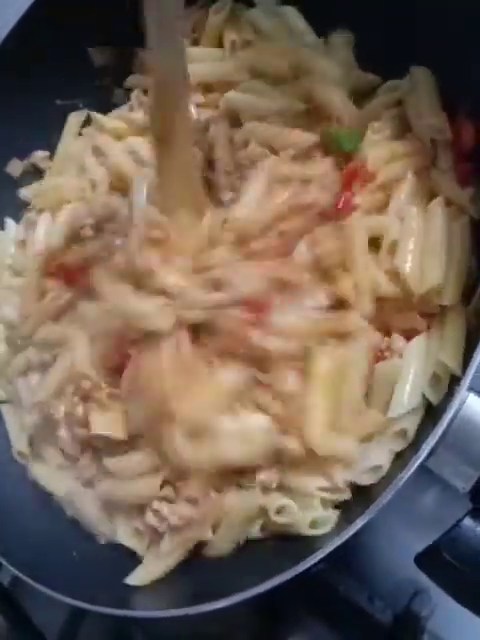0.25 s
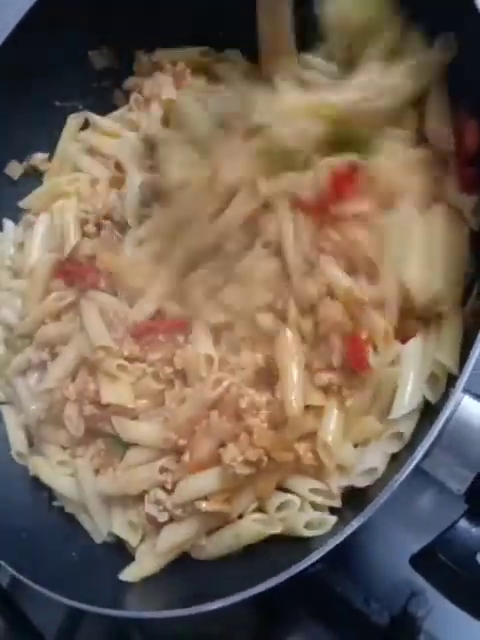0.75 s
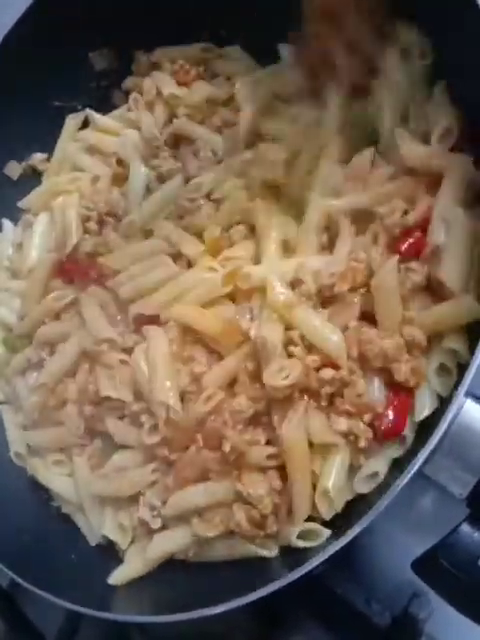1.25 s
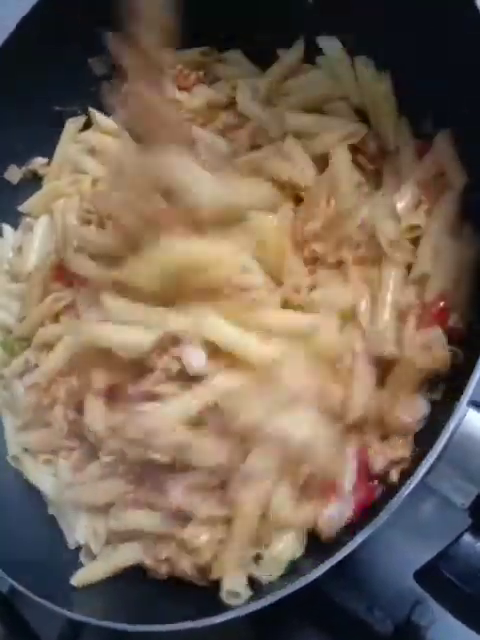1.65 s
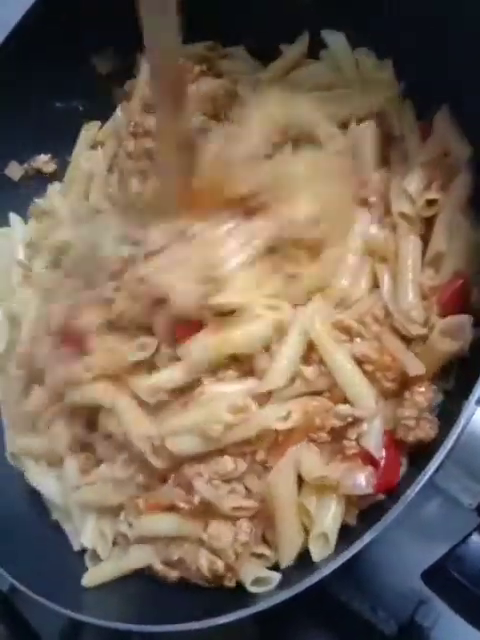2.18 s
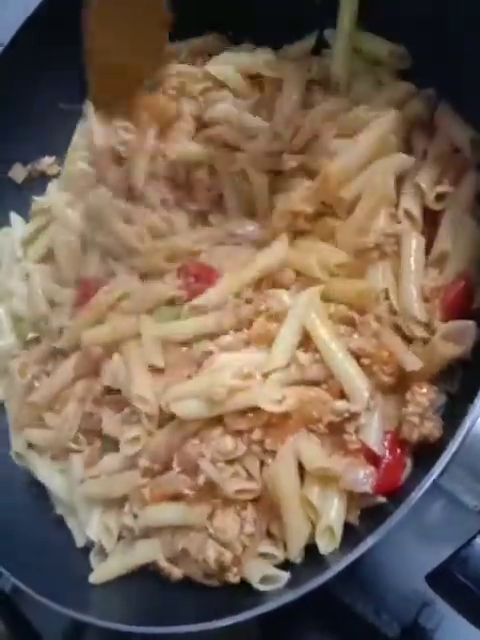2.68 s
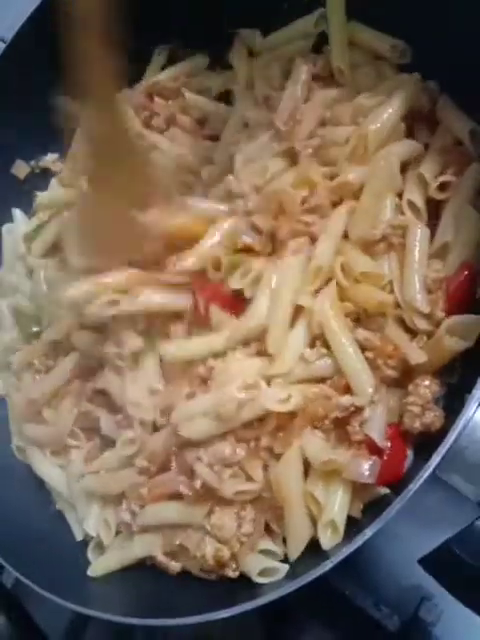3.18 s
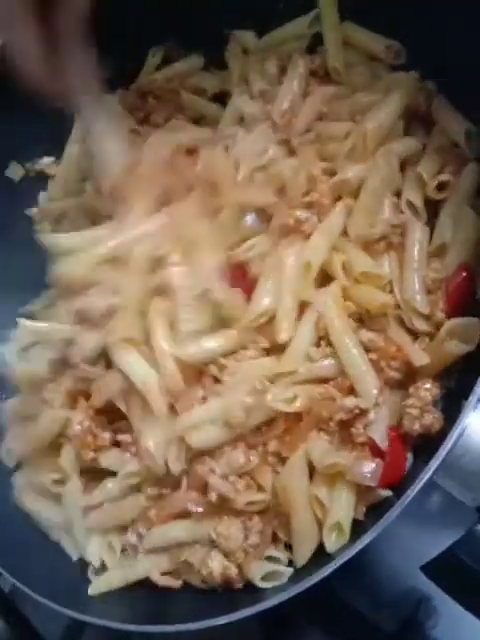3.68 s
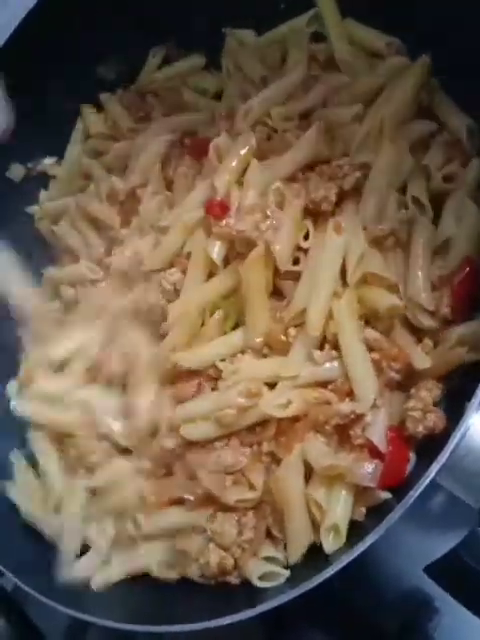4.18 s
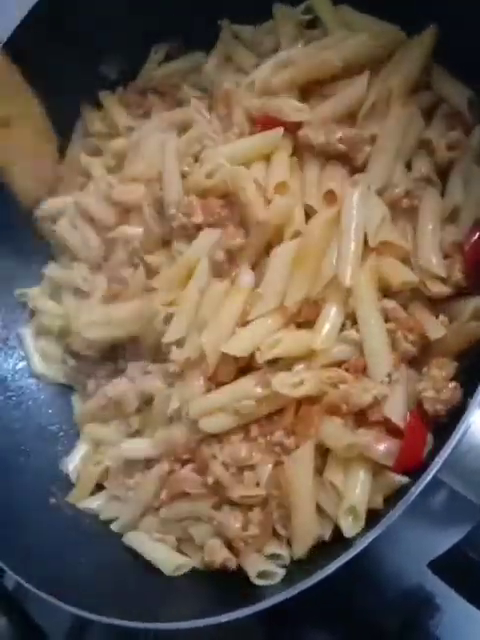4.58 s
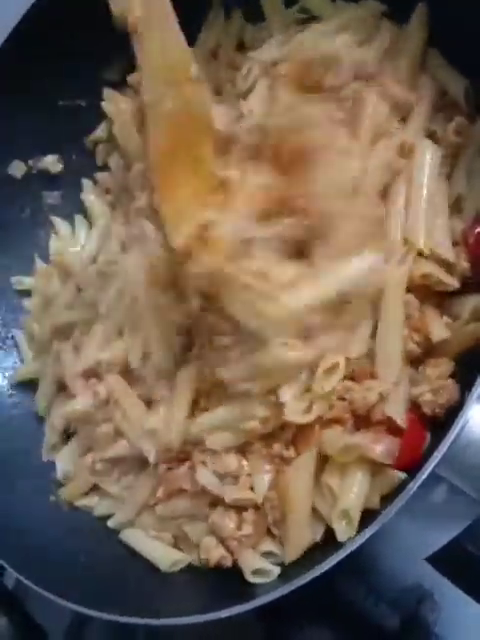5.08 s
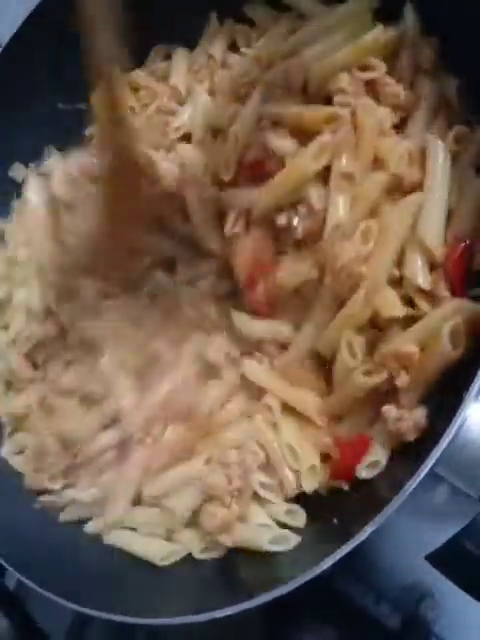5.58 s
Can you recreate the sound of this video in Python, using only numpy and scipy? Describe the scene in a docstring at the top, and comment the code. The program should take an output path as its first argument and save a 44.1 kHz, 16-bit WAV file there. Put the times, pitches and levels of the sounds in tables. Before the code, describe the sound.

A wooden spoon scrapes and tosses sticky sauced pasta in a pan, with wet squelches, wooden knocks and a low stove rumble.

```python
"""A wooden spoon stirs sauced penne in a nonstick pan on a stove, close to the microphone.
From the start the strokes scrape by stick-slip and sauce films tear, over the stove's filtered-noise rumble and hiss.
Rubbery squeaks, wooden knocks with ringing modes and sticky ticks soon join; a sine mains hum comes in spells.
Knocks and thuds of the rocking pan crowd together near the middle; later the spoon's bare shaft raps the rim.
Stirring goes on to the end, with a short, soft echo of nearby walls behind it.
"""
import sys
import numpy as np
from scipy import signal
from scipy.fft import rfft, irfft, next_fast_len
from scipy.io import wavfile
from scipy.ndimage import uniform_filter1d, map_coordinates

SR = 44100
rng = np.random.default_rng(int(sys.argv[2]) if len(sys.argv) > 2 else 0)


def generate_wav(signal):
    """Clip the signal to [-1, 1] and save it as 16-bit WAV at the path in sys.argv[1]."""
    frames = np.transpose(np.atleast_2d(signal))
    scaled = np.clip(frames, -1, 1) * 32767
    pcm = np.round(scaled).astype(np.int16)
    wavfile.write(sys.argv[1], SR, pcm)


N = 257984


def amp(db):
    """Decibels to amplitude ratio."""
    return 10 ** (np.asarray(db) / 20)


def unit(x):
    """Normalisation to an rms of 1."""
    return x / np.sqrt(np.mean(x ** 2) + 1e-20)


def peak(x):
    """Normalisation to a peak of 1."""
    return x / (np.abs(x).max() + 1e-20)


def wobble(rate):
    """Slow random modulation: a smooth curve through rate random knots a second."""
    return map_coordinates(rng.standard_normal(int(N * rate / SR) + 4), [np.arange(N) * rate / SR])


def add(track, s, sound):
    """Superposition: mix a sound into the track at s seconds."""
    part = track[max(round(s * SR), 0):][:len(sound)]
    part += sound[:len(part)]


def colour(x, points, size=8192):
    """Minimum-phase filtering: a causal response with the gain of the (Hz, dB) points."""
    hz, db = np.transpose(points)
    gain = amp(np.interp(np.log(np.fft.rfftfreq(size, 1 / SR) + 1), np.log(hz), db))
    # folding the cepstrum onto positive time makes the response causal
    cepstrum = irfft(np.log(gain))
    cepstrum[1:size // 2] *= 2
    cepstrum[size // 2 + 1:] = 0
    response = irfft(np.exp(rfft(cepstrum)))[:size // 2]
    return signal.fftconvolve(x, response)[:len(x)]


def ring(modes, scatter_db, tilt_db=0):
    """Modal superposition: neighbours swing in opposite senses; tilt_db an octave weights the upper modes."""
    hz, width, db = np.transpose(modes)[:, :, None]
    t = np.arange(SR // 4) / SR
    tilt = tilt_db * np.maximum(np.log2(hz / np.median(hz)), 0)
    level = db + tilt + scatter_db * rng.standard_normal(hz.shape)
    sense = (-1) ** np.arange(len(hz))[:, None]
    decay = np.exp(-np.pi * width * t)
    return np.sum(sense * amp(level) * width * decay * np.sin(2 * np.pi * hz * t), axis=0)


def through(x, modes):
    """Forced vibration: a steady excitation rings a set of modes."""
    return unit(signal.fftconvolve(x, ring(modes, scatter_db=2.5))[:N])


def grains(rate, spread_db):
    """Impulsive excitation: random tiny clicks of uneven size, rate a second."""
    sizes = amp(spread_db * np.clip(rng.standard_normal(N), -2, 2)) * rng.choice([-1, 1], N)
    return unit((rng.random(N) < rate / SR) * sizes)


def shifting(x, depth_db, width_hz, span_s):
    """Time-varying filtering: the colour drifts in random patches of frequency and time."""
    z = signal.stft(x, nperseg=1024)[2]
    field = rng.standard_normal(z.shape)
    field = uniform_filter1d(field, max(round(width_hz * 1024 / SR), 1), axis=0, mode="wrap")
    field = uniform_filter1d(field, max(round(span_s * SR / 512), 1), axis=1, mode="wrap")
    return unit(signal.istft(z * amp(depth_db * unit(field)), nperseg=1024)[1][:N])


# Bands that reflections in the pan cancel or reinforce.
# Each row: centre in Hz, width in Hz, depth in dB before the share is taken.
HOLLOWS = [(2550, 130, -3.5), (2820, 110, 2), (3090, 130, -9), (3350, 90, -2), (3610, 75, -8),
           (4220, 100, -6), (4520, 150, 2), (5020, 140, -8), (5320, 80, 3), (5640, 90, 2.5),
           (6240, 100, -2.5), (7100, 120, -1.5)]


def hollowed(x, share=1):
    """Interference: reflections between the pan's wall and the food carve gaps and humps into the treble."""
    hz = np.arange(1, SR // 2, 20)
    db = sum(depth * np.exp(-((hz - centre) / width) ** 2) for centre, width, depth in HOLLOWS)
    return colour(x, np.transpose([hz, share * db]))


# Strokes of the spoon.
# Each row: hardest push in seconds, rise in seconds, fall in seconds, scraping level in dB,
# base level of the wet pasta in dB, level of the pan dragged on its support in dB,
# fizz level in dB before its common lift, scrape pitch at the hardest push in Hz.
STROKES = [(0.0, 0.15, 0.1, -32, -40, -72, -60.5, 1160), (0.07, 0.049, 0.21, -48, -48.5, -40, -68, 920),
           (0.257, 0.74, 0.28, -50, -50, -62, -73.5, 1010), (0.55, 0.031, 0.22, -40, -45, -47.5, -72, 1570),
           (0.705, 0.07, 0.11, -31, -41, -40.5, -65.5, 1270),
           (0.886, 0.092, 0.32, -51.5, -52.5, -61, -69, 990), (1.265, 0.034, 0.12, -49, -50, -57, -72, 750),
           (1.34, 0.072, 0.37, -43.5, -46, -73, -71, 1330),
           (1.666, 0.13, 0.1, -50.5, -59.5, -55, -79, 1440), (2.01, 0.13, 0.17, -39, -42.5, -61, -68, 1015),
           (2.22, 0.35, 0.099, -46, -52.5, -78, -77, 1430), (2.495, 0.29, 0.2, -45, -46.5, -83, -70, 1360),
           (2.738, 0.094, 0.24, -43, -47, -40.5, -75, 850),
           (2.866, 0.07, 0.061, -33, -41, -39, -60.5, 1540), (2.919, 0.085, 0.07, -36, -41, -36, -65, 1000),
           (3.045, 0.12, 0.19, -37.5, -46.5, -35, -79, 835),
           (3.464, 0.049, 0.02, -44, -44.5, -43, -66.5, 995),
           (3.557, 0.068, 0.27, -38.5, -41.5, -43, -69, 960),
           (3.665, 0.047, 0.078, -48, -53.5, -69, -76, 1150),
           (4.093, 0.033, 0.26, -58, -48, -75, -75, 1320), (4.26, 0.14, 0.42, -44.5, -46, -56, -71, 1130),
           (4.64, 0.096, 0.11, -42, -47, -48, -69, 1160), (4.746, 0.11, 0.078, -30, -37.5, -65, -59.5, 850),
           (4.841, 0.12, 0.38, -73, -45.5, -59, -75, 985), (5.375, 0.2, 0.3, -47.5, -44.5, -65, -63, 940),
           (5.504, 0.23, 0.15, -46.5, -48, -57, -76, 1010),
           (5.721, 0.077, 0.036, -46.5, -73, -58, -84, 860), (5.86, 0.073, 0.2, -50, -50, -44, -72, 965)]
PUSH_S, FADE_DB = 0.048, 20  # time held at full force; change of level over one rise or fall time


def stirring(levels_db, lingers=1, lag_s=0):
    """Energy addition: strokes rise, hold and fall away, and overlapping ones add in power."""
    t, power = np.arange(N) / SR - lag_s, np.zeros(N)
    for (s, rise, fall, *_), db in zip(STROKES, levels_db):
        before = (s - PUSH_S / 2 - t) / rise
        after = (t - s - PUSH_S / 2) / fall
        away = np.maximum(before, after).clip(0) / lingers  # lingers stretches both rise and fall
        near = away < 3
        power[near] += amp(db - FADE_DB * away[near]) ** 2
    return np.sqrt(power)


SAG_OCT_PER_S, SAG_S = 2.5, 0.038  # fall of pitch, for this long either side of the hardest push


def gliding(x, lift_db, width_oct):
    """Moving resonance: the contact's spectral hump slides down in pitch as the spoon digs in."""
    hz, t, z = signal.stft(x, SR, nperseg=512)
    s, *_, pitch_hz = np.transpose(STROKES)
    stroke = np.abs(t[:, None] - s).argmin(axis=1)  # the nearest stroke sets the pitch
    sag_oct = SAG_OCT_PER_S * np.clip(t - s[stroke], -SAG_S, SAG_S)
    centre_hz = pitch_hz[stroke] * 2 ** -sag_oct
    octaves = np.log2((hz[:, None] + 1) / centre_hz)
    hump = amp(lift_db * np.exp(-(octaves / width_oct) ** 2))
    return unit(signal.istft(z * hump, nperseg=512)[1][:N])


# Modes of the loaded pan. Each row: frequency in Hz, width in Hz, relative level in dB.
PAN = [(591.7, 5.5, -2.5), (682, 26, -4), (870, 274, 0.5), (986, 145, 6), (1078, 22, 0.5), (1159, 16, 1.5),
       (1304, 50, -1.5), (1504, 146, 0.5), (1610, 110, -10), (1757, 135, -2.5), (1920, 350, -15.5),
       (2580, 420, -40.5), (2894, 220, -19.5), (3294, 190, -11), (3960, 55, -27.5), (3900, 87, -21.5),
       (4510, 230, -24), (5320, 170, -18.5), (5880, 98, -34.5), (6460, 310, -45), (7440, 52, -36.5)]
# Modes of the pan on its support. Each row: frequency in Hz, width in Hz, relative level in dB.
SUPPORT = [(135, 35, -9), (222, 14, 3.5), (298, 16, -1), (342, 22, -3.5), (386, 16, -2), (440, 60, -12),
           (580, 30, -5)]
# Spectrum of the rubbing contact. Each row: frequency in Hz, relative level in dB per Hz.
SCRAPE_SPECTRUM = [(350, -21.5), (450, -20), (560, -2), (650, 1), (850, 5), (1400, -6), (1900, -1),
                   (2300, -8.5), (4500, -29.5), (8000, -62)]
DRAG_LAG_S, DRAG_LINGERS = 0.0058, 0.47  # the pan gives way late; its rise and fall times shrink by this factor


def scraping():
    """Stick-slip friction: wood slips on the coating and rings the pan; strokes drag it on its support."""
    _, _, _, scrape_db, _, drag_db, _, _ = np.transpose(STROKES)
    slips = grains(rate=1500, spread_db=1) * amp(1.6 * wobble(70))
    metal_spectrum = [(1500, 1.0), (3000, 4.5), (7000, -3.0)]  # the pan's ring is lifted near 3 kHz, duller above
    metal = unit(colour(through(slips, PAN), metal_spectrum))
    rub = amp(-2.0) * unit(colour(slips, SCRAPE_SPECTRUM)) + metal
    rub = shifting(rub, depth_db=2.3, width_hz=130, span_s=.05)
    rub = gliding(rub, lift_db=5, width_oct=.45)
    jerks = colour(grains(rate=410, spread_db=0.5), [(230, -2.5), (390, -0.33), (580, 0.023)])
    judder = through(jerks, SUPPORT)
    return stirring(scrape_db) * rub + stirring(drag_db, DRAG_LINGERS, DRAG_LAG_S) * judder


def bubbles(rate, low_hz, high_hz, cycles, spread_db):
    """Bubble resonance: air pockets opening in the sauce ring a few cycles, rising a little in pitch."""
    out, t = np.zeros(N), np.arange(SR // 40) / SR
    for when, size, strength, life in rng.random((int(rate * N / SR), 4)):
        hz = low_hz * (high_hz / low_hz) ** size
        age = t * hz / (cycles * (.5 + life))
        envelope = (1 - np.exp(-4 * age)) * np.exp(-age)
        pop = envelope * np.sin(2 * np.pi * hz * t * (1 + 0.057 * np.tanh(age / 2)))
        add(out, when * N / SR, amp(-spread_db * np.log(1.03 - strength)) * pop)
    return unit(out)


# Spectrum of the wet crackle. Each row: frequency in Hz, relative level in dB per Hz.
WET_SPECTRUM = [(500, -16), (1200, 5.5), (1900, 7), (2500, 3), (2850, -2), (3150, 1), (3450, 2), (4600, -1),
                (5080, -0.5), (5500, -2.5), (7800, -5.5), (10000, -4.5), (15500, -20)]
# Faint spits of fizz in the top octave. Each row: centre in seconds, level in dB before the fizz's common lift.
SPITS = [(1.049, -67), (1.635, -69.5), (3.315, -64), (3.77, -65.5), (5.409, -53), (5.495, -69)]
SPIT_S = .015  # half the length of a spit
WET_LINGERS = 1.24  # the pasta's slide rises and falls this many times longer than the spoon's push
REST_DB = -70.5  # the heap creeping between strokes, on the scale of the wet pasta levels


def squelching():
    """Film rupture: sauce tears between moving tubes in pan-coloured crackle, wet pops and coarser squelches."""
    *_, wet_db, _, fizz_db, _ = np.transpose(STROKES)
    t = np.arange(N) / SR
    tears = grains(rate=3500, spread_db=5) * amp(1.6 * wobble(70))
    metal = unit(colour(through(tears, PAN), [(700, -24.5), (1800, -6.0), (2700, 8), (7000, 2.0)]))
    crackle = unit(colour(tears, WET_SPECTRUM)) + amp(-5.0) * metal
    crackle = shifting(crackle, depth_db=3, width_hz=170, span_s=.06)
    pops = bubbles(rate=260, low_hz=1100, high_hz=8500, cycles=10, spread_db=3)
    squelches = bubbles(rate=90, low_hz=650, high_hz=2600, cycles=6, spread_db=2.5)
    wet = amp(0.5) * crackle + amp(-6.0) * pops + amp(-8.5) * squelches

    sliding = np.hypot(stirring(wet_db, WET_LINGERS), amp(REST_DB))
    sliding = sliding * amp(.9 * wobble(16))  # the heap moves in small lurches

    fizz_spectrum = [(8000, -38), (11500, -9.0), (15500, -0.5), (17000, -24.5)]
    fizz = unit(colour(grains(rate=1700, spread_db=5.5), fizz_spectrum))
    spits = sum(amp(db) * np.exp(-((t - s) / SPIT_S) ** 2) for s, db in SPITS)
    spitting = (stirring(fizz_db) + spits) * amp(15.5 + 1.5 * wobble(25.2))  # lift in dB, fluttering
    return sliding * wet + spitting * fizz


def surging(rows):
    """Amplitude modulation: the sum in dB of brief bell-shaped swells and dips."""
    t = np.arange(N) / SR
    return sum(db * np.exp(-((t - s) / half) ** 2) for s, half, db in rows)


# Spectrum of the rumble. Each row: frequency in Hz, relative level in dB per Hz.
RUMBLE_SPECTRUM = [(25, -54.5), (50, -33.5), (85, -9), (120, 7.5), (145, 7), (163, 0), (190, 7.5),
                   (226, 7.5), (270, -13.5), (298, -9), (350, -21), (430, -40.5), (900, -41)]
# Swells and dips of the rumble. Each row: centre in seconds, half length in seconds, change in dB.
RUMBLE_SURGES = [(0.21, 0.062, 6.5), (0.516, 0.018, -19), (1.021, 0.038, -19), (1.314, 0.02, -10),
                 (1.583, 0.033, -13), (2.453, 0.021, 5.5), (2.573, 0.026, -15), (3.14, 0.019, -29),
                 (3.616, 0.069, 3), (3.93, 0.16, -4.5), (1.78, 0.09, -2), (4.78, 0.061, -5.5),
                 (4.855, 0.018, 6.5), (5.09, 0.012, -30), (5.25, 0.13, -10.5), (5.78, 0.055, -2.5)]


def rumble(level_db=-40.5, flutter_db=3.17):
    """Filtered noise: a low roar, evened out in power and then given its own flutter."""
    roar = shifting(colour(rng.standard_normal(N), RUMBLE_SPECTRUM), depth_db=3.2, width_hz=45, span_s=.13)
    power = uniform_filter1d(uniform_filter1d(roar ** 2, SR // 20), SR // 20)
    roar /= np.sqrt(np.abs(power) + 1e-12)
    return amp(level_db + flutter_db * wobble(26) + surging(RUMBLE_SURGES)) * roar


# Spectrum of the hiss as the pan colours it. Each row: frequency in Hz, relative level in dB per Hz.
HISS_SPECTRUM = [(300, -34), (450, -18), (545, -3), (615, 5.5), (665, -6), (860, 1), (980, 2.5), (1250, 8),
                 (1570, 3), (1900, 5), (2200, -14.5), (2600, -18), (2780, -13), (3400, -14.5), (4000, -13),
                 (4550, -10.5), (5300, -11), (7500, -6), (10000, -22), (15500, -28)]
# Swells and dips of the hiss. Each row: centre in seconds, half length in seconds, change in dB.
HISS_SURGES = [(1.0, 0.1, 0.5), (1.21, 0.014, 0), (1.78, 0.074, -1.5), (3.28, .1, 0.5), (3.93, 0.054, -3.5),
               (5.79, 0.076, -6.5)]


def hiss():
    """Broadband noise: a gently wavering hiss, coloured by the pan and its reflections."""
    air = hollowed(colour(rng.standard_normal(N), HISS_SPECTRUM))
    air = shifting(air, depth_db=3.2, width_hz=130, span_s=.11)
    return amp(-47.5 + 1.5 * wobble(7.9) + surging(HISS_SURGES)) * air


# Spells of mains hum. Each row: on in seconds, off in seconds, level in dB around which it wavers.
HUM_SPELLS = [(0.244, 0.94, -47), (2.097, 2.847, -44), (3.072, 3.822, -48.5), (5.207, 5.736, -42.5)]
HUM_SWITCH_S, HUM_IDLE_DB = 0.054, -72  # how fast it comes and goes; its level between spells
HUM_WAVER_DB, HUM_WAVER_RAD = 1.7, .55  # depth of its waver in level and in phase


def hum(mains_hz=57.85):
    """Harmonic tones: a wavering fundamental comes in spells over an octave of steady level."""
    t = np.arange(N) / SR
    gain = amp(HUM_IDLE_DB)
    for on, off, db in HUM_SPELLS:
        gain = gain + amp(db) * (np.tanh((t - on) / HUM_SWITCH_S) - np.tanh((t - off) / HUM_SWITCH_S)) / 2
    phase = 2 * np.pi * mains_hz * t + HUM_WAVER_RAD * wobble(16)
    fundamental = gain * amp(HUM_WAVER_DB * wobble(23)) * np.sin(phase)
    return fundamental + amp(-53.5) * np.sin(2 * phase)


SQUEAK_WIDTH_HZ = 139.6  # random changes a second: the unevenness of the slipping widens each squeak


def squeak(half_s, hz, glide):
    """Narrow-band noise: random modulation roughens a short tone that swells, glides and fades."""
    t = np.arange(-2 * half_s, 2 * half_s, 1 / SR)
    knots = rng.standard_normal((2, SR // 100))
    a, b = (map_coordinates(k, [(t - t[0]) * SQUEAK_WIDTH_HZ], mode="mirror") for k in knots)
    phase = 2 * np.pi * np.cumsum(hz * 2 ** (glide * t)) / SR
    swell = np.exp(-(t / half_s) ** 2)
    return unit(swell * (a * np.sin(phase) + b * np.cos(phase))) * np.sqrt(np.mean(swell ** 2))


# Clear rubbery squeaks of pasta and wood on the coating.
# Each row: centre in seconds, half length in seconds, level in dB, pitch in Hz, glide in octaves per second.
SQUEAKS = [(0.012, 0.011, -31.5, 1077, -2.5), (0.878, .009, -44, 1154, -0.5), (0.956, .03, -48, 1310, -2),
           (1.162, 0.017, -51, 628, 0), (1.331, 0.03, -44.5, 1312, -0.5), (1.416, 0.024, -50, 1000, -0.5),
           (2.05, .025, -45, 1050, 1), (2.501, 0.026, -53, 1246, 0), (2.766, 0.02, -40, 1280, -1),
           (2.857, 0.023, -42, 1650, -1.5), (2.946, 0.0086, -35.5, 1370, -2),
           (3.433, 0.014, -39, 1350, 3.5), (3.598, 0.016, -42, 1286, 2), (3.677, .025, -51, 1357, -0.5),
           (5.368, 0.019, -41, 932, -0.5)]


def squeaking(rate=45, low_hz=650, high_hz=4200, half_s=.007, small_db=-0.5, tilt_db=-1.5):
    """Frictional squeal: a few clear squeaks, and many small rubs of tube on tube as the heap slides."""
    out = np.zeros(N)
    for s, half, db, hz, glide in SQUEAKS:
        add(out, s - 2 * half, amp(db) * squeak(half, hz, glide))
    _, _, _, _, wet_db, _, _, _ = np.transpose(STROKES)
    sliding = stirring(wet_db, WET_LINGERS)
    for when, size, life, bend in rng.random((int(rate * N / SR), 4)):
        hz, half = low_hz * (high_hz / low_hz) ** size, half_s * (.5 + life)
        gain = sliding[int(when * N)] * amp(small_db + tilt_db * np.log2(hz / low_hz))
        add(out, when * N / SR - 2 * half, gain * squeak(half, hz, 20 * (bend - .5)))
    return out


def note(hz, t60):
    """Damped resonance: one decaying sine of peak near 1 with a soft start."""
    t = np.arange(SR // 4) / SR
    return np.sin(2 * np.pi * hz * t) * amp(-60 * t / t60) * (1 - np.exp(-2 * hz * t))


# Knocks of the spoon against the pan.
# Each row: start in seconds, contact level in dB, level of the thud on the support in dB, contact pitch in Hz,
# relative treble in dB, chatter relative to the first impulse in dB, chatter decay by 60 dB in seconds,
# level of the note at the contact pitch in dB, thud pitch in Hz.
KNOCKS = [(0.0539, -15, -41, 920, -25.5, -23, 0.13, -31, 222),
          (0.518, -9.5, -51, 1256, -13, -17, 0.032, -22.5, 219),
          (0.528, -20, -60, 970, -28, -28, 0.095, -25, 218),
          (0.86, -36, -40, 1160, -28, -17, .04, -39, 201), (1.104, -51, -38, 1730, -38, -22, .03, -43, 196),
          (1.232, -36, -54, 764, -24, -17, 0.12, -43, 151),
          (1.294, -35, -56, 1400, -28, -20, .04, -38, 219),
          (1.937, -25, -43, 910, -38, -20, 0.15, -32, 217),
          (1.967, -29, -54, 1160, -20, -6, 0.086, -41, 220),
          (2.277, -33.5, -69, 1070, -27, -9, 0.055, -44, 220),
          (2.405, -27, -64, 1540, -21, -20.5, 0.086, -51, 220),
          (2.465, -32, -47, 1750, -18, -17, 0.026, -39, 213),
          (2.719, -32, -54, 1940, -27, -17, 0.033, -56, 220),
          (2.7233, -20.5, -33, 1233, -24, -25, 0.2, -21, 374),
          (2.747, -31, -35, 1230, -32, -18, .06, -29.5, 382),
          (2.823, -23, -33, 1510, -29, -20, 0.015, -34, 220),
          (2.9026, -7.5, -38, 993, -20, -27, 0.064, -27, 220),
          (2.916, -22, -24.5, 734, -22, -17, 0.045, -24, 314),
          (3.0465, -13.5, -29, 1260, -24.5, -24, 0.082, -32, 213),
          (3.051, -36, -22, 554, -28, -17, 0.049, -28, 224),
          (3.058, -21.5, -41, 1324, -23, -24, 0.04, -35, 224),
          (3.068, -32, -24.5, 760, -30, -23, .04, -38, 308),
          (3.084, -37, -25.5, 1100, -31, -20, .04, -44, 215),
          (3.405, -39, -47, 1580, -25, -26, 0.03, -46, 220),
          (3.4495, -20.5, -37, 970, -21.5, -20.5, 0.067, -33, 220),
          (3.464, -25.5, -29, 893, -17, -23, 0.045, -30, 297),
          (3.533, -13.5, -31, 960, -18, -25, 0.054, -22, 216),
          (3.537, -41, -40, 760, -19, -11, 0.064, -24.5, 218),
          (3.549, -26.5, -25, 510, -21, -28, .05, -33, 326),
          (3.572, -40, -51, 1260, -26, -13, 0.056, -35, 220),
          (3.59, -43, -25.5, 920, -19, -22, 0.036, -46, 185),
          (4.788, -26.5, -56, 685, -22, -17, 0.17, -30, 220),
          (5.134, -52, -35, 1100, -14, -23, 0.036, -58, 160),
          (5.2879, -27, -55, 1220, -21, -17, 0.16, -47, 218),
          (5.336, -21, -66, 1150, -21, -23.5, 0.11, -26, 220),
          (5.366, -35.5, -58, 895, -29, -14, 0.051, -37, 220),
          (5.412, -27, -55, 1270, -11, -20, .08, -42, 220)]
RING_DB = -4.5  # the pan's ring relative to the contact
NOTE_T60_S, THUD_T60_S = 0.064, 0.06  # how long the struck spot sings, and how long the pan rocks


def knocks():
    """Impact excitation: a dry wooden clack, the pan's food-damped modes and note, and a rocking thud."""
    out, t = np.zeros(N), np.arange(SR // 4) / SR
    for s, contact_db, thud_db, hz, treble_db, chatter_db, t60, note_db, thud_hz in KNOCKS:
        push = rng.standard_normal(len(t)) * amp(chatter_db - 60 * t / t60)  # the wood chatters as it lands
        push[0] += 1
        body = [(450, -22), (hz * 0.74, -6), (hz, 0), (hz * 1.17, -3), (hz * 1.52, -10)]
        edge = [(2550, treble_db - 6.5), (3200, treble_db + 1.0), (4400, treble_db), (5100, treble_db - 3.5),
                (5900, treble_db - 4), (7500, treble_db - 5.0), (10000, -42.0)]
        clack = peak(colour(push, body + edge))
        add(out, s, amp(contact_db) * clack)

        pan_ring = peak(ring(PAN, scatter_db=-4.5, tilt_db=treble_db / 5))  # a brighter blow keeps more upper modes
        add(out, s, amp(contact_db + RING_DB) * pan_ring)
        add(out, s, amp(note_db) * note(hz, NOTE_T60_S))

        # a slow shove spares the upper modes
        rocking = colour(ring(SUPPORT, scatter_db=4), [(thud_hz, 0), (thud_hz * 2, -16)])
        thud = peak(note(thud_hz, THUD_T60_S) + amp(-5) * peak(rocking))
        add(out, s, amp(thud_db) * thud)
    return out


# Sticky pasta snapping apart. Each row: start in seconds, peak in dB before a common 2 dB lift, pitch in Hz.
SMACKS = [(0.14, -34, 3400), (1.603, -37, 7400), (1.883, -29, 5650), (2.077, -38, 6750), (2.245, -37, 4580),
          (2.4945, -40, 5930), (2.537, -32.5, 3480), (2.684, -33.5, 4430), (2.8633, -25, 2910),
          (3.0095, -29.5, 4100), (3.014, -21.5, 4350), (3.131, -33, 3340), (3.4282, -36, 5300),
          (3.574, -45, 4150), (3.658, -36, 3400), (4.048, -42, 3810), (4.2687, -37, 2700),
          (4.7074, -25.5, 2920), (4.7644, -29, 2850), (4.8644, -33, 3410), (5.3298, -25, 2360),
          (5.375, -33, 2730)]


def smacks():
    """Sudden release: larger sticky pockets let go with a short, bright tick of filtered noise."""
    out, t = np.zeros(N), np.arange(SR // 20) / SR
    for s, db, hz in SMACKS:
        burst = rng.standard_normal(len(t)) * amp(-60 * t / 0.022)
        tick = peak(colour(burst, [(hz / 2, -19), (hz, 0), (hz * 2, -11)]))
        add(out, s, amp(db + 2) * tick)
    return out


# Bending modes of the wooden spoon. Each row: frequency in Hz, width in Hz, relative level in dB.
SPOON = [(710, 200, 3), (887, 180, 5.5), (1825, 160, 4.5), (2350, 63, 8.5), (2830, 170, -1.5),
         (3580, 47, 0.5), (4070, 150, 0), (4850, 190, -1.5), (5930, 260, -9.5)]
# The spoon's shaft rapping the rim and rebounding. Each row: start in seconds, peak in dB.
RAPS = [(4.5797, -10.5), (4.5808, -11.5)]


def rap():
    """Bending vibration: the bare shaft meets the rim and rings briefly with its own modes."""
    out = np.zeros(N)
    for s, db in RAPS:
        bending = ring(SPOON, scatter_db=0.5)
        radiated = colour(bending, [(350, -15), (700, -3)])  # a thin shaft radiates little bass
        add(out, s, amp(db) * peak(radiated))
    return out


def kitchen(x, t60=0.36, wet_db=-13):
    """Reverberation: decaying noise stands for the short, soft echo of nearby walls."""
    t = np.arange(SR // 2) / SR
    tail = rng.standard_normal(len(t)) * amp(-60 * t / t60) * (1 - np.exp(-t / 0.0036))
    return x + amp(wet_db) * signal.fftconvolve(x, tail / np.linalg.norm(tail))[:N]


def scene():
    """Superposition of sources: spoon, pasta and pan with their echo, over the stove and the hum."""
    # the moving sources partly fill in the hollows
    stirred = hollowed(scraping() + squelching() + squeaking(), share=.65)
    stove = rumble() + hiss() + hum()
    return (kitchen(stirred + knocks() + smacks() + rap()) + stove)[None]


# Treble response of the microphone. Each row: frequency in Hz, gain in dB.
MICROPHONE = [(7700, -1.5), (8400, -6.5), (9300, -28), (10300, -27), (11400, -33), (12500, -26.5),
              (15500, -16)]
TOP_HZ = 15850  # steep band limit


def record(dry):
    """Band limiting: a small microphone drops the deepest bass and is dull in the top octave."""
    heard = colour(dry[0], MICROPHONE)
    heard = signal.sosfilt(signal.butter(2, 35, "highpass", fs=SR, output="sos"), heard)
    size = next_fast_len(N + SR // 2)
    passband = np.fft.rfftfreq(size, 1 / SR) < TOP_HZ
    return irfft(rfft(heard, size) * passband, size)[None, :N]


dry = scene()
out = record(dry)
generate_wav(out)
```